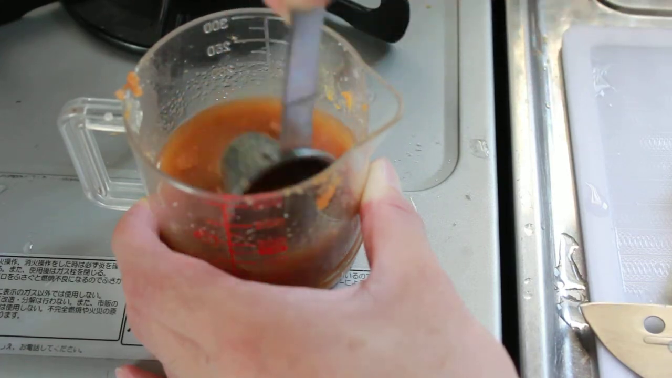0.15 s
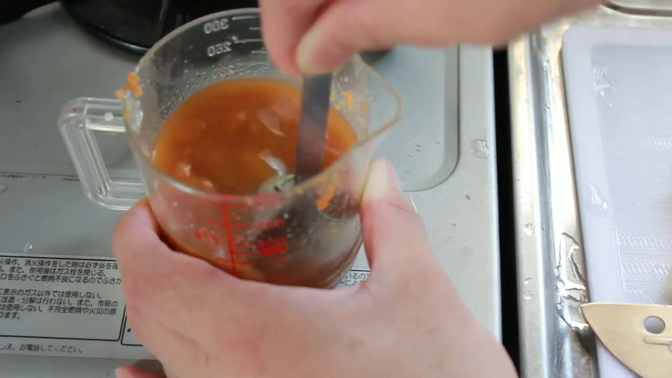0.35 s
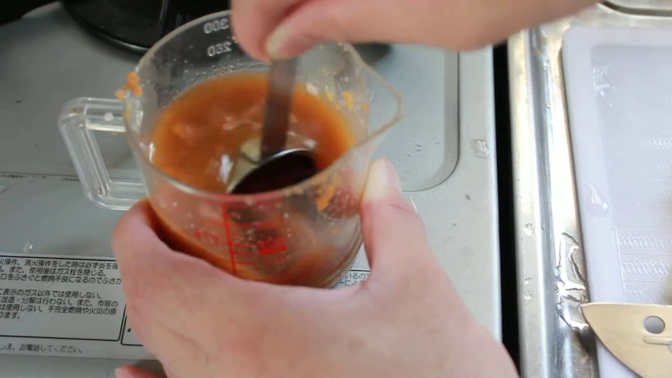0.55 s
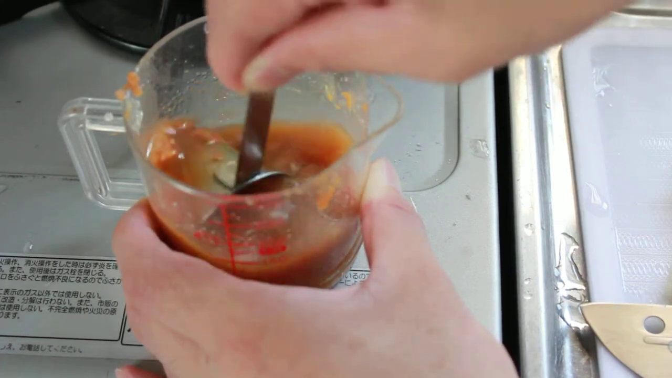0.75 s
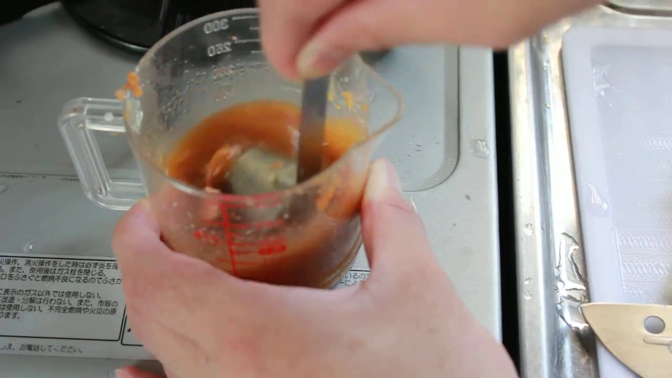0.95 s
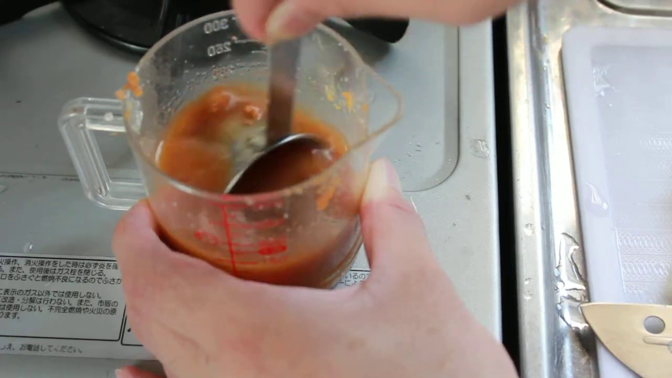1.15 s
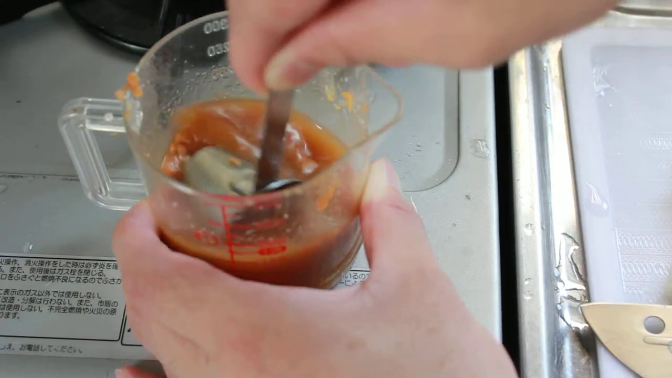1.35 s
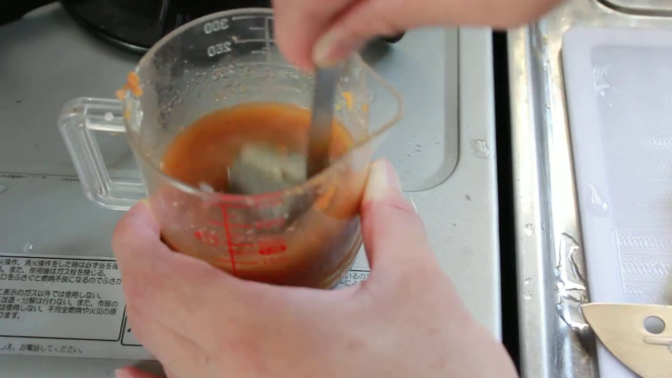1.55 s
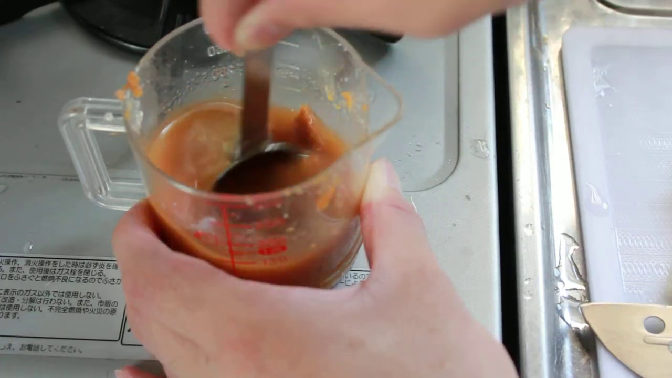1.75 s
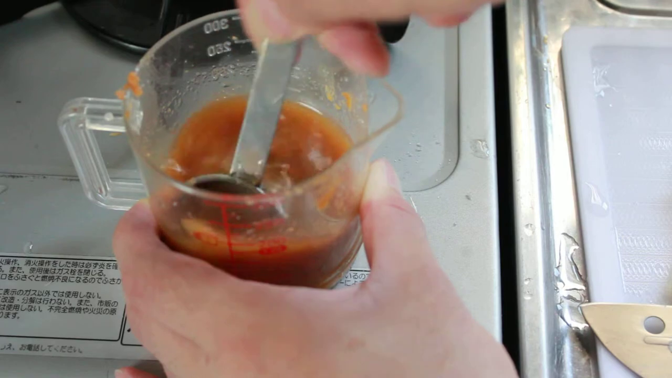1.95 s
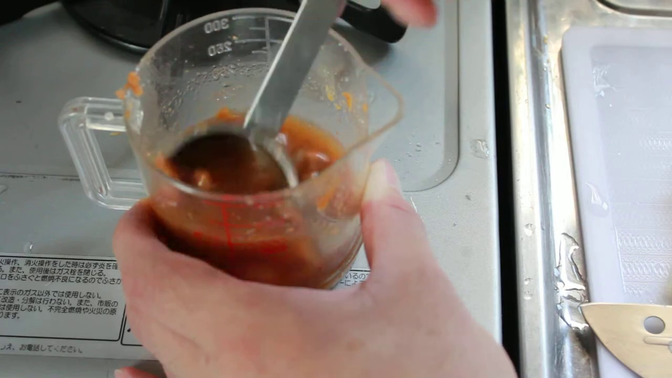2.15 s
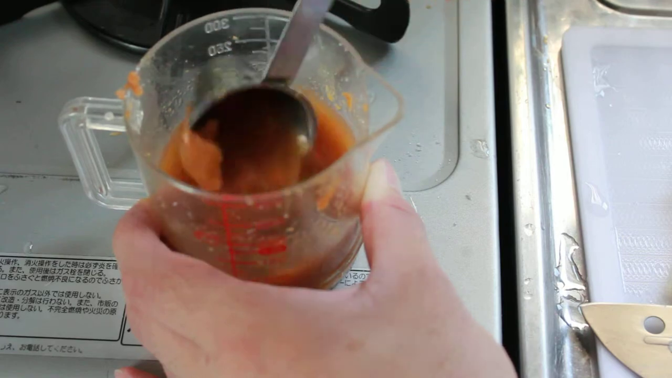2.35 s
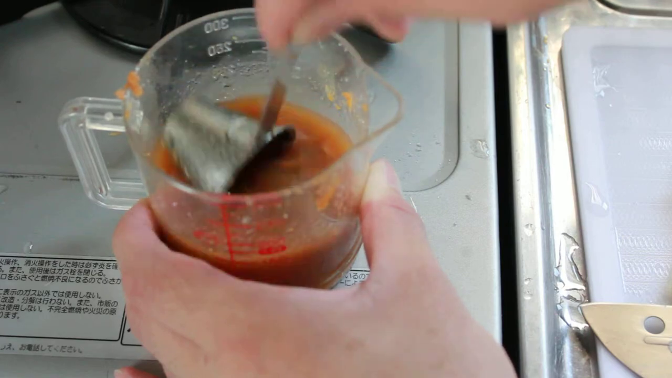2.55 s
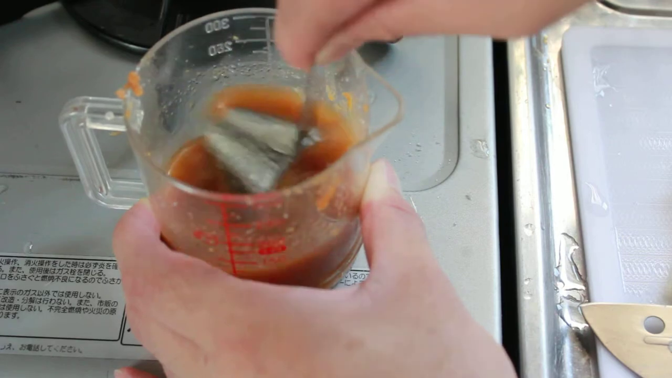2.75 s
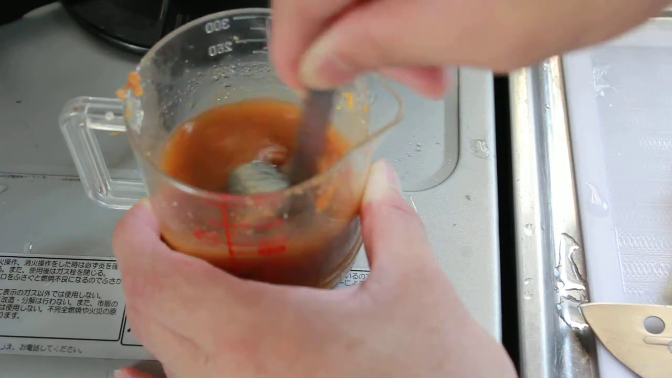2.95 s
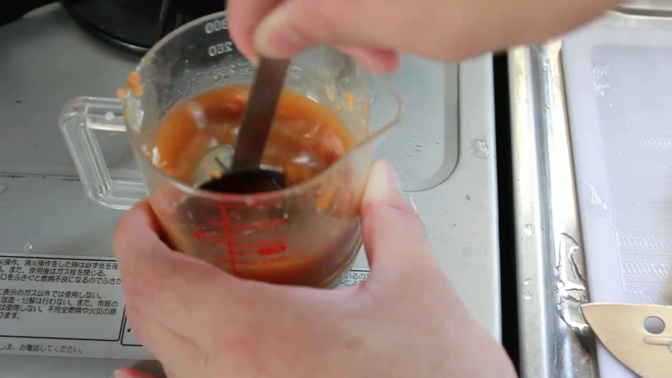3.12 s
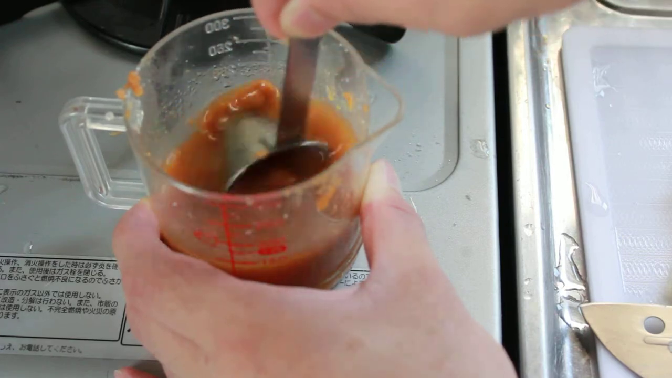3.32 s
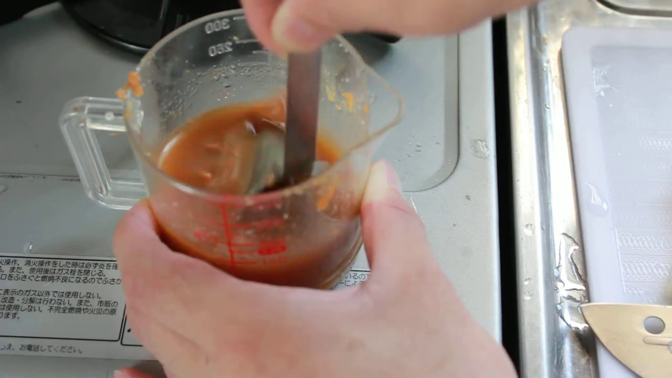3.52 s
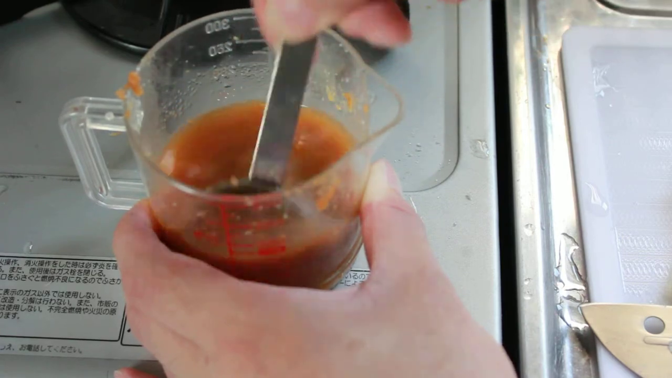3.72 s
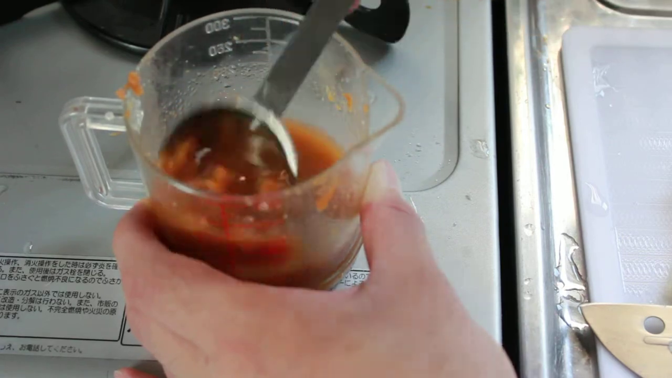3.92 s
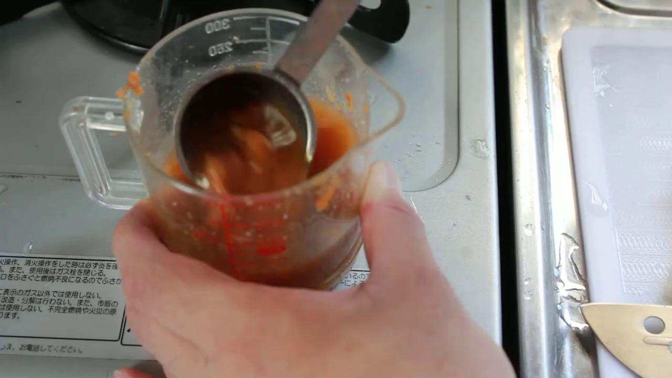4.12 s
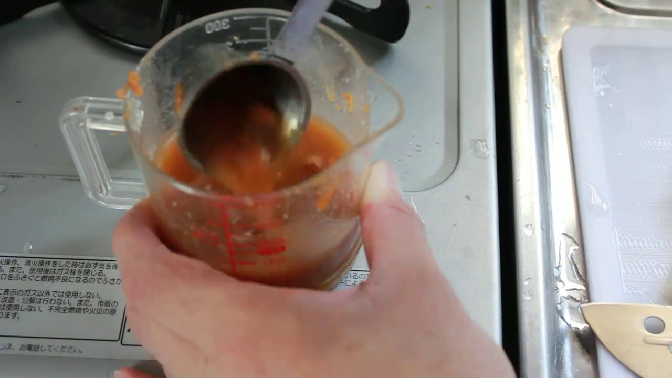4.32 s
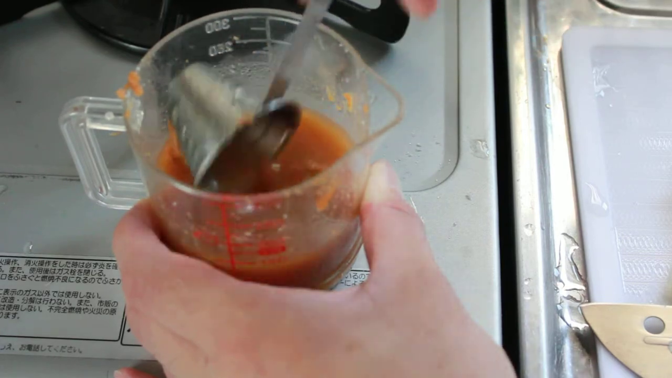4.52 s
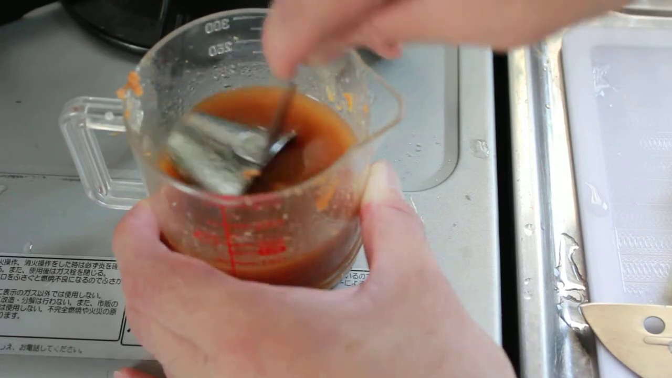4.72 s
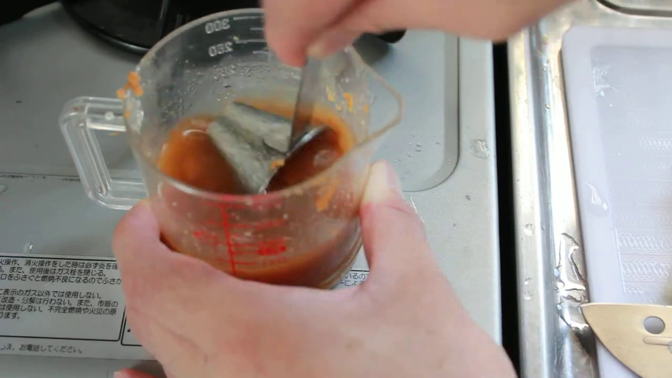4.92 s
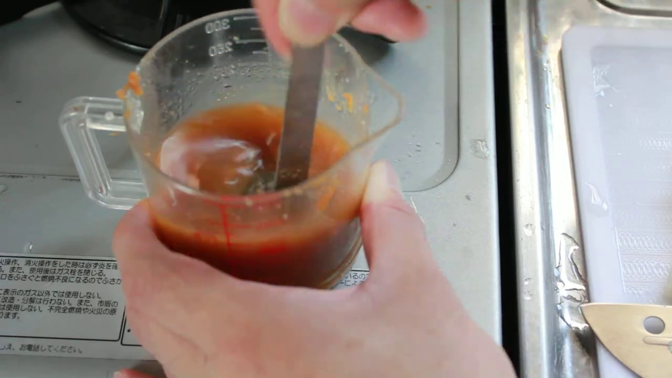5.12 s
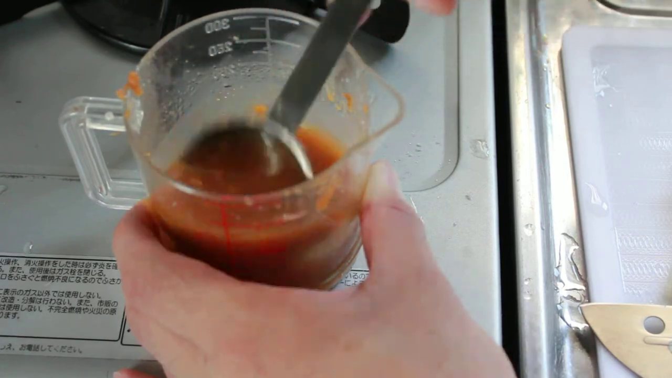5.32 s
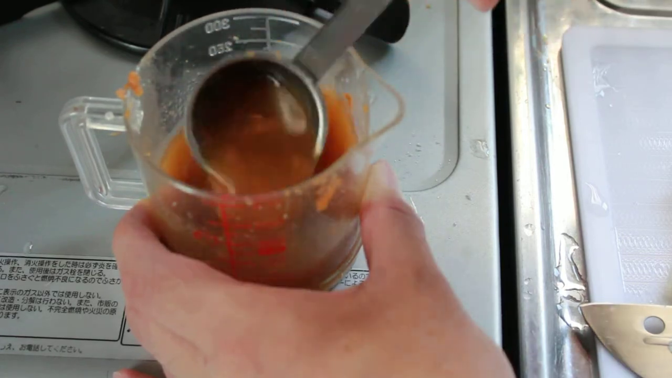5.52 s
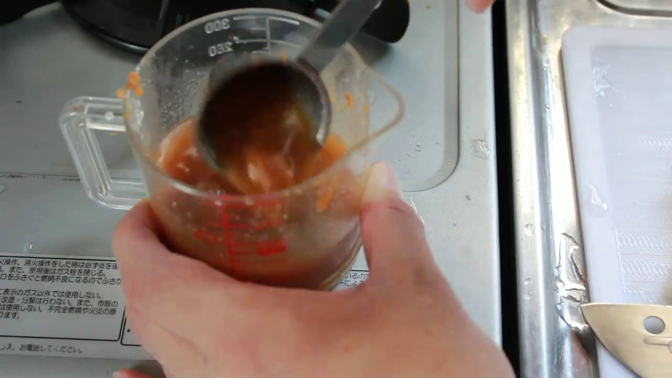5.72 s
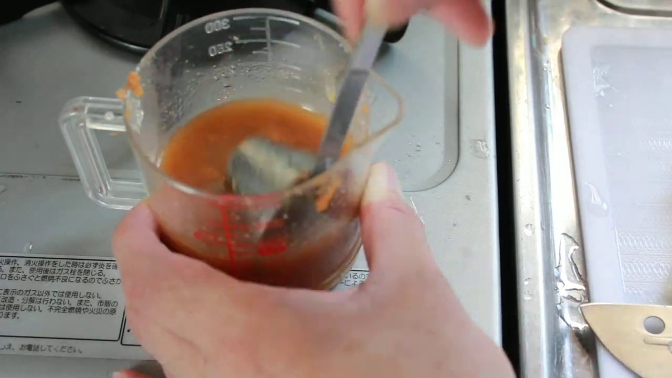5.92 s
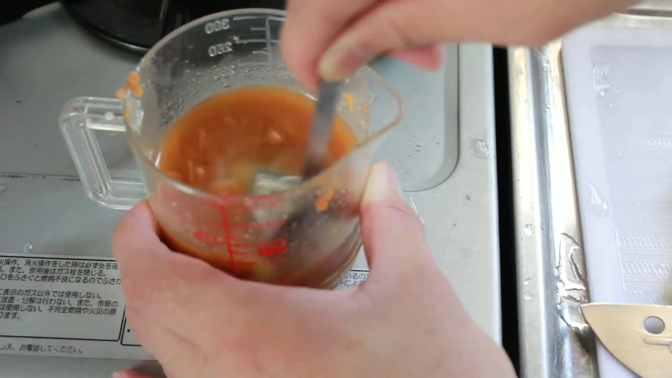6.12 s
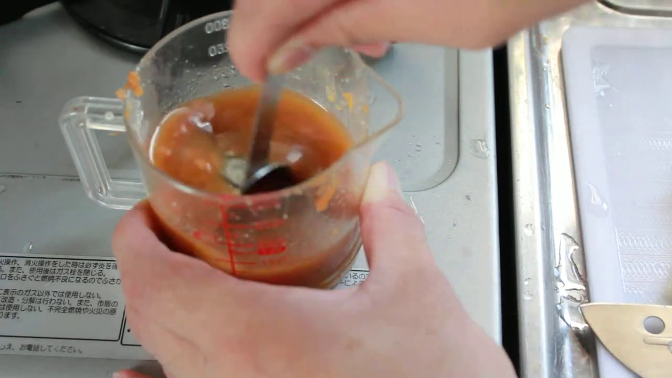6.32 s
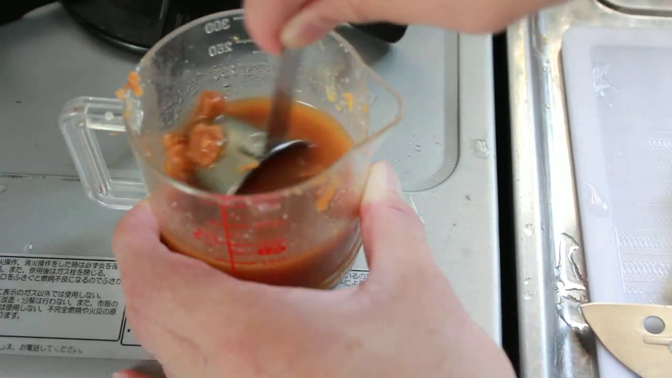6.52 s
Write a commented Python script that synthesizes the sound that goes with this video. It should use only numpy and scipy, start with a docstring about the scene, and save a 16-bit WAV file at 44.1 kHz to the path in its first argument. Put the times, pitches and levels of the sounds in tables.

```python
"""A steel measuring spoon stirs thick sauce in a hand-held plastic cup in a small hard kitchen.
For two seconds it knocks, chatters and drags on the wall: bursts of noise ring the cup, the sauce gulps low.
After a lull come the loudest knocks, near 2.6 and 2.9 s; a lull follows from 3.9 s, with drops ticking and
chirping at 4.2 and 4.3 s. A flurry from 4.6 s gives way to rising sine pings, lighter knocks and a last short
ping near 2.9 kHz. Decaying noise bands make the room ring on over coloured air noise and thin whines."""
import sys
import numpy as np
from scipy import signal
from scipy.fft import rfft, irfft, next_fast_len
from scipy.io import wavfile
from scipy.ndimage import uniform_filter1d

SR = 44100
rng = np.random.default_rng(int(sys.argv[2]) if len(sys.argv) > 2 else 0)


def unload_audio(sound):
    """Save the sound as a 16-bit wav file, at the path given as the first command line argument."""
    columns = np.transpose(np.atleast_2d(sound))
    # keep every value between -1 and 1, then stretch to whole-number steps
    steps = np.round(np.clip(columns, -1, 1) * 32767)
    wavfile.write(sys.argv[1], SR, steps.astype(np.int16))


def ratio(d):
    """dB to gain"""
    e = np.asarray(d, float) / 20
    return 10 ** e


N = 289731

# Spoon knocks on the wall. Each row: start in seconds, clack level in dB (as a sine's peak),
# thud level in dB rms, tick level in dB rms, chatter decay constant in ms.
SPOON_KNOCKS = [(0.1242, -14.5, -32.5, -33.5, 3.2), (0.1308, -17, -32, -45, 11),
                (0.1799, -21.5, -40, -29, 4), (0.2317, -31, -60, -36.5, 13), (0.2614, -19, -36.5, -28.5, 2),
                (0.344, -21, -32.5, -26, 6), (0.4249, -40, -55, -37, 3.6),
                (0.488, -21.5, -39.5, -37.5, 3.6), (0.565, -28.5, -45, -54, 5.3),
                (0.609, -20.5, -40.5, -29, 4.7), (0.7089, -15, -66, -24.5, 5.7),
                (0.7248, -20, -45, -30, 9.7), (0.776, -27.5, -35.5, -51, 4.0),
                (0.838, -16.5, -49, -33, 2.1), (0.8446, -19.5, -57, -26.5, 14),
                (1.03, -26.5, -30, -43, 8.3), (1.0816, -22.5, -27.5, -34, 5),
                (1.1288, -17.5, -42, -29.5, 3.4), (1.2358, -22, -37.5, -34, 7.3),
                (1.356, -29, -52, -47, 7.3), (1.3746, -22, -45, -34, 12), (1.4014, -24.5, -54, -32, 18),
                (1.509, -17.5, -32.5, -27, 4.3), (1.5507, -20, -45, -31.5, 8.5),
                (1.587, -23.5, -54, -35, 5.5), (1.685, -20, -29.5, -31.5, 6.1),
                (1.723, -18.5, -36.5, -22.5, 2.4), (1.7674, -28, -55, -28.5, 5.7),
                (1.821, -29, -39, -42, 2.6), (1.8534, -21.5, -49, -28.5, 22),
                (1.9144, -12.5, -22, -22.5, 7.4), (1.9639, -26.5, -30, -60, 5.7),
                (1.9956, -21, -50, -30.5, 15.4), (2.4506, -35, -40.5, -41, 5.6),
                (2.538, -30, -56, -38.5, 4.5), (2.6334, -7.5, -32, -20, 3.5), (2.725, -24, -47, -36, 5.9),
                (2.7468, -12.5, -52, -21.5, 4.2), (2.776, -24, -40, -50, 2.8), (2.842, -19, -31, -32, 6.8),
                (2.8873, -16.5, -34.5, -23, 9.1), (2.9082, -8, -21.5, -46, 2.3),
                (2.9955, -26.5, -45, -38.5, 27), (3.1334, -34, -38, -75, 1.8),
                (3.2645, -28, -37.5, -46, 5.3), (3.268, -16, -23.5, -33, 5.4),
                (3.4582, -28, -53, -27.5, 14), (3.473, -15, -25.5, -24.5, 6.6),
                (3.5292, -19.5, -43, -26, 5.8), (3.5827, -22, -34.5, -36, 14), (3.6305, -29, -55, -35, 3.1),
                (3.6571, -26, -43, -40, 25), (3.6725, -14.5, -26.5, -22, 2.7), (3.7254, -35, -45, -32, 2.4),
                (3.764, -29, -45, -27.5, 5.6), (3.7873, -20, -44, -29, 3.5), (3.8685, -23.5, -56, -62, 6.6),
                (4.6, -9.5, -30.5, -26.5, 3.4), (4.681, -26, -52, -34.5, 13),
                (4.7394, -9.5, -32, -22.5, 4.1), (4.785, -28, -60, -38, 2.1), (4.8205, -34, -54, -32, 4.5),
                (4.8396, -42, -50, -31, 10), (4.8697, -19, -33, -28.5, 3.4),
                (4.9898, -28.5, -35.5, -34, 13), (5.0099, -16, -40, -21.5, 13),
                (5.1352, -16.5, -25, -33, 5.2), (5.1419, -17.5, -26, -24, 7.5),
                (5.1992, -21, -57, -29, 2.4), (5.2076, -14.5, -60, -26, 1.8), (5.2224, -21, -50, -24, 3.6),
                (5.5299, -35, -67, -43, 11), (5.9076, -37, -48, -48, 7.1), (5.933, -20.5, -42, -43.5, 8.7),
                (6.0339, -27.5, -52, -41, 6.6), (6.0662, -14.5, -38, -25.5, 8.8),
                (6.1116, -25.5, -55, -32, 7.2), (6.1885, -29, -45, -32, 3.4),
                (6.279, -31, -37.5, -38.5, 4.6), (6.3683, -35.5, -51, -38.5, 5.6),
                (6.3972, -34, -58, -47, 5.6), (6.4785, -27.5, -46, -39.5, 4.4), (6.522, -44, -48, -44, 5.2)]
# Knocks whose spot on the wall favours some resonances. Each row: time in seconds, favoured pitch in Hz.
FAVOURED_PITCHES = [(0.1304, 1330), (0.344, 3050), (0.7091, 3150), (0.8444, 3600), (1.031, 1090),
                    (1.1288, 3080), (1.509, 2300), (1.723, 4950), (1.9159, 3400), (2.6332, 2730),
                    (2.7468, 1420), (2.9089, 1420), (3.268, 2640), (3.6725, 2450), (3.8676, 1570),
                    (4.5999, 1360), (4.7392, 2570), (5.0109, 4670), (5.1354, 3380), (5.2074, 3140),
                    (5.9074, 1680), (5.9328, 1420), (6.0669, 2060), (6.4792, 2900)]
# Resonances of the sauce-filled cup. Each row: pitch in Hz, width in Hz, mean strength in dB.
CUP_MODES = [(323, 28, -7), (504.7, 97, -6.5), (929, 95, -4), (1090, 43, -1), (1410, 150, -4.5),
             (1940, 156, -1.5), (2536, 465, -7.5), (3120, 62, 3), (3450, 156, 0.5), (4486, 172, 0.5),
             (5160, 620, -9), (5860, 172, -2.5), (6365, 110, -6.5), (7105, 290, -6), (7930, 870, -17.5),
             (10400, 460, -7.5), (13300, 1700, -16.5)]
# Plain crack of steel on plastic between the resonances. Each row: frequency in Hz, gain in dB.
PLAIN_CRACK = [(150, -30), (300, -20), (1000, -17), (4000, -16), (9000, -16), (13000, -19), (16000, -23)]
# Strokes along the wall. Each row: fastest moment in seconds, rasp level in dB, hiss level in dB,
# build-up in seconds per 20 dB, fade in seconds per 20 dB.
WALL_STROKES = [(0.202, -38, -55, 0.057, 0.33), (0.44, -35, -45, 0.1, 0.17), (0.519, -43, -60, 0.15, 0.02),
                (0.791, -37, -56, 0.14, 0.24), (0.91, -32, -39, 0.17, 0.055),
                (1.002, -41, -57, 0.022, 0.17), (1.192, -41, -53.5, 0.088, 0.32),
                (1.49, -39.5, -48, 0.24, 0.23), (1.67, -34.5, -46, 0.35, 0.088),
                (1.84, -32, -46, 0.078, 0.13), (2.12, -47, -75, 0.15, 0.055),
                (2.469, -50, -51, 0.045, 0.19), (2.7, -37, -48, 0.086, 0.1), (2.79, -30, -30, 0.12, 0.078),
                (2.84, -26, -27, 0.04, 0.11), (3.04, -39, -51, 0.35, 0.19), (3.49, -32.5, -40, 0.048, 0.29),
                (3.61, -34.5, -33.5, 0.1, 0.064), (3.7, -31, -53, 0.08, 0.05), (3.819, -31, -41, 0.16, 0.1),
                (4.83, -34, -40.5, 0.033, 0.27), (4.97, -33.5, -42, 0.061, 0.23),
                (5.045, -27, -35, 0.042, 0.097), (5.279, -43, -49, 0.15, 0.055),
                (5.911, -42.5, -59, 0.03, 0.05), (6.1, -49, -50, 0.05, 0.3), (6.18, -34, -40.5, 0.15, 0.12),
                (6.31, -44.5, -60, 0.08, 0.42), (6.53, -40.5, -53, 0.085, 0.23)]
# Surges of sauce pushed against the wall. Each row: time in seconds, gulp level in dB,
# level in dB of the rumble of the cup's base.
SAUCE_SURGES = [(0.165, -37, -44), (0.29, -40.5, -38), (0.42, -58, -45), (0.78, -38.5, -40),
                (1.1, -37, -42.5), (1.22, -55, -38), (1.41, -47, -44), (1.55, -43, -33.5),
                (1.75, -47, -37.5), (1.89, -50, -38), (2.04, -40, -38.5), (2.47, -43, -42.5),
                (2.68, -48, -36.5), (2.84, -36.5, -38.5), (2.92, -39.5, -31), (3.02, -53, -44),
                (3.11, -42, -36), (3.49, -43, -41), (3.69, -38.5, -33.5), (3.85, -44.5, -40),
                (4.65, -44, -38.5), (4.76, -39.5, -33.5), (4.87, -38, -40), (5.12, -40, -42.5),
                (5.29, -48, -45.5), (5.92, -44.5, -41), (6.09, -45.5, -41), (6.23, -46, -40.5),
                (6.42, -51.5, -47.5)]
# Air pockets closing in the sauce. Each row: ringing pitch in Hz, relative strength in dB.
AIR_POCKETS = [(155, -7.5), (210, -2.5), (245, 1.5), (325, -3)]
# Drops and short pings: plinks in the sauce, small clinks of the spoon. Each row: start in seconds,
# ping peak in dB, starting pitch in Hz, time to fall 60 dB in seconds.
SHORT_PINGS = [(2.4326, -35, 3450, 0.018), (4.2147, -26.5, 5350, 0.0073), (4.322, -40, 7600, 0.027),
               (5.399, -32.5, 1290, 0.018), (5.5302, -13.5, 5650, 0.0064), (5.5635, -20, 1410, 0.023),
               (5.655, -26, 2750, 0.0086), (6.4793, -23, 2920, 0.034)]
# Reverberation of the kitchen. Each row: frequency in Hz, time to fall 60 dB in seconds.
ROOM_DECAY = [(200, 0.43), (600, 0.3), (1500, 0.46), (4000, 0.26), (10000, 0.17), (16000, 0.13)]
# Colour of the background air noise. Each row: frequency in Hz, relative density in dB per Hz.
AIR_COLOUR = [(18, -5), (30, -5.5), (124, 0), (157, -6), (184, 2.5), (319, 4.5), (584, -5.5), (801, -5.5),
              (1070, -10.5), (1760, -14.5), (5900, -22.5), (6380, -21), (8300, -25), (10500, -25),
              (16000, -31)]
# Appliance whines. Each row: pitch in Hz, level in dB rms.
APPLIANCE_WHINES = [(312.2, -67.5), (985.1, -67.5), (3079, -68), (5469, -91), (6261, -69.5), (10573, -89),
                    (10783, -68)]


def knocks(grain_db=1.5, clump_db=2.0, rise_share=0.064, thud_width_hz=69.0, thud_detune=0.062):
    """A knock is a swelling and dying run of uneven contacts that ring the cup."""
    size = 4096
    head, blur = 660, 130  # samples: 15 ms to level thud and tick, 3 ms for the clack
    spread_db, detune = 2.5, 0.025
    out = np.zeros(N + size)
    f, t = np.fft.rfftfreq(size, 1 / SR), np.arange(size) / SR
    low, middle, high = three_bands(f)
    for s, clack_db, thud_db, tick_db, chatter_ms in SPOON_KNOCKS + bumps():
        age = 1000 * t / chatter_ms
        contacts = rng.standard_normal(size) * ratio(grain_db * rng.standard_normal(size))
        # ragged clusters of slips
        contacts *= ratio(clump_db * np.repeat(rng.standard_normal(size // 64), 64))
        contacts *= (1 - np.exp(-age / rise_share)) * np.exp(-age) * (t < 0.05)

        # moving sauce loads the wall anew each time: strengths and pitches shift
        strength, tuning = rng.standard_normal((2, len(CUP_MODES)))
        body = cup(f, spread_db * strength + favour(s), 1 + detune * tuning)
        # the heavy base mode carries the thud
        base_hz = CUP_MODES[1][0] * (1 + thud_detune * tuning[1])
        base = low * resonance(f, base_hz, thud_width_hz)

        ringing = rfft(contacts) * body
        thud, clack, tick = (irfft(ringing * band) for band in (base, middle, high))
        sound = ratio(clack_db) * clack / np.sqrt(2 * uniform_filter1d(clack ** 2, blur).max())
        sound += ratio(thud_db) * thud / thud[:head].std()
        sound += ratio(tick_db) * tick / tick[:head].std()
        i = round(s * SR)
        out[i:i + size] += sound
    return out[:N]


def bumps(scatter_s=0.03, over_rasp_db=-0.6, spread_db=3.9):
    """Each stroke also bumps the wall lightly once, at a chance moment, about as strongly as it rasps."""
    chance = rng.standard_normal((len(WALL_STROKES), 2))
    rows = []
    for (s, rasp_db, *_), (early, more) in zip(WALL_STROKES, chance):
        db = rasp_db + over_rasp_db + spread_db * more
        start = min(s + scatter_s * early, N / SR)
        rows.append((start, db, db - 12, db - 7.5, 6.6))  # columns as in SPOON_KNOCKS
    return rows


def favour(s, boost_db=7.5, reach_octaves=0.43):
    """Extra dB for each resonance near the pitch favoured by the spot struck at time s."""
    near = [hz for at, hz in FAVOURED_PITCHES if abs(at - s) < 0.004]
    mode_hz = np.array(CUP_MODES)[:, 0]
    return sum(boost_db * np.exp(-(np.log2(mode_hz / hz) / reach_octaves) ** 2) for hz in near)


def cup(f, mode_db, tuning):
    """The cup's answer to a touch: its resonances, each with a strength and tuning, over the plain crack."""
    answer = ratio(at_hz(PLAIN_CRACK, f))
    for k, ((hz, width, db), more, shift) in enumerate(zip(CUP_MODES, mode_db, tuning)):
        answer = answer + (-1) ** k * ratio(db + more) * resonance(f, hz * shift, width)
    return answer


def drag(slips_per_s=1500.0, grain_db=3.5, judder_db=2.0, gulps_per_s=150.0, gulp_width_hz=36.6):
    """The spoon's edge sticks and slips in clumps and sounds through the cup; the pushed sauce gulps low."""
    sizes = ratio(grain_db * np.minimum(rng.exponential(1, N), 3.0)) * rng.choice([-1, 1], N)
    slips = sizes * (rng.random(N) < slips_per_s / SR) * ratio(judder_db * drift(33.0))
    size = next_fast_len(N)
    f = np.fft.rfftfreq(size, 1 / SR)
    low, middle, high = three_bands(f)

    # the edge wanders over five spots of the wall, each stirring the resonances in its own way
    spots, changes_per_s = 5, 12.0  # the second sets the pace of the wander
    spot = np.argmax([drift(changes_per_s) for _ in range(spots)], axis=0)
    colours = rng.standard_normal((spots, 2, len(CUP_MODES)))
    rubbed = 0
    for k, (more, shift) in enumerate(colours):
        rubbed = rubbed + rfft(slips * (spot == k), size) * cup(f, 3.0 * more, 1 + 0.06 * shift)

    sloshed = 0
    for hz, db in AIR_POCKETS:
        closings = rng.random(N) < gulps_per_s / len(AIR_POCKETS) / SR
        gulps = rng.standard_normal(N) * closings
        sloshed = sloshed + ratio(db) * rfft(gulps, size) * resonance(f, hz, gulp_width_hz) ** 2

    spectra = (rubbed * middle, rubbed * low, rubbed * high, sloshed)
    rasp, rumble, hiss, slosh = [rms_one(irfft(x, size)[:N]) for x in spectra]
    s, rasp_db, hiss_db, rise_s, fade_s = np.transpose(WALL_STROKES)
    out = swells(s, rasp_db, rise_s, fade_s) * rasp
    out += swells(s, hiss_db, rise_s, fade_s) * hiss
    s, gulp_db, rumble_db = np.transpose(SAUCE_SURGES)
    rise_s, fade_s = 0.09, 0.21  # per 20 dB
    out += swells(s, gulp_db, rise_s, fade_s) * slosh
    out += swells(s, rumble_db, rise_s, fade_s) * rumble
    return out


def swells(s, db, rise_s, fade_s):
    """Gain over time of events that build up to their level and fade, straight in dB; times are per 20 dB."""
    t = np.arange(N) / SR
    level_db = np.full(N, -120.0)
    for at, top, rise, fade in np.broadcast(s, db, rise_s, fade_s):
        late = t - at
        level_db = np.maximum(level_db, top - 20 * np.maximum(late / fade, -late / rise))
    return ratio(level_db)


def short_pings(rise=3.4, tick_db=-22.0):
    """Drops and short pings, plinks or small clinks: a noise tick and a sine whose pitch climbs as it dies."""
    t = np.arange(4410) / SR
    out = np.zeros(N + len(t))
    for s, peak_db, hz, t60 in SHORT_PINGS:
        ping = np.sin(2 * np.pi * hz * (t + rise * t ** 2)) * ratio(-60 * t / t60)
        tick = np.diff(rng.standard_normal(len(t) + 1)) * np.exp(-t / 0.0014)
        i = round(s * SR)
        out[i:i + len(t)] += ratio(peak_db) * (ping + ratio(tick_db) * tick)
    return out[:N]


def kitchen(x, first_echo_s=0.0018):
    """Dense echoes: half-octave bands of noise, each dying at its own rate."""
    t, tail = np.arange(SR // 2) / SR, 0
    edges = 150 * 2 ** np.arange(0, 7.1, 0.5)
    for low, high in zip(edges, edges[1:]):
        band_pass = signal.butter(2, [low, high], "band", fs=SR, output="sos")
        band = signal.sosfilt(band_pass, rng.standard_normal(len(t)))
        tail = tail + band * ratio(-60 * t / at_hz(ROOM_DECAY, np.sqrt(low * high)))
    tail *= 1 - np.exp(-(t / first_echo_s) ** 2)  # the echoes set in softly
    return signal.fftconvolve(x, tail / np.sqrt(np.sum(tail ** 2)))[:N]


def background(air_db=-48, whine_width_hz=7.3):
    """Coloured air noise, and whines as noise in very narrow resonances."""
    size = next_fast_len(N)
    f = np.fft.rfftfreq(size, 1 / SR)
    air_white, whine_white = rfft(rng.standard_normal((2, size)))
    out = ratio(air_db) * rms_one(irfft(air_white * ratio(at_hz(AIR_COLOUR, f)), size))
    for hz, db in APPLIANCE_WHINES:
        narrow = resonance(f, hz, whine_width_hz * np.sqrt(hz / 1000)) ** 2
        out += ratio(db) * rms_one(irfft(whine_white * narrow, size))
    return out[:N]


def resonance(f, hz, width_hz):
    """Complex response of one resonance, gain 1 on top."""
    return 1j * f * width_hz / (hz ** 2 - f ** 2 + 1j * f * width_hz)


def three_bands(f, deep_hz=260, low_hz=720, high_hz=7000):
    """Low, middle and high parts of the spectrum; the small cup radiates nothing deep."""
    def edge(hz, kind):
        return signal.freqs(*signal.butter(4, hz, kind, analog=True), f)[1]
    low = edge(deep_hz, "high") * edge(low_hz, "low")
    middle = edge(low_hz, "high") * edge(high_hz, "low")
    return low, middle, edge(high_hz, "high")


def drift(rate_hz):
    """Slow random wander of rms 1: noise through two equal one-pole low-passes, started a second early."""
    r = np.exp(-2 * np.pi * rate_hz / SR)
    return rms_one(signal.lfilter([1], [1, -2 * r, r * r], rng.standard_normal(N + SR))[SR:])


def rms_one(x):
    """Scale to rms 1."""
    return x / np.sqrt(np.mean(x ** 2) + 1e-20)


def at_hz(points, hz):
    """Read a table of frequency and value on a log-frequency axis."""
    table_hz, values = np.transpose(points)
    return np.interp(np.log(hz + 1), np.log(table_hz), values)


def scene(room_db=-5, rim_shade_db=-2):
    """Everything at the cup is heard directly and through the room; the rim shades the pings from the walls."""
    wall, pings = knocks() + drag(), short_pings()
    room = kitchen(wall + ratio(rim_shade_db) * pings)
    mix = wall + pings + ratio(room_db) * room + background()
    return mix[None]


def band_limit(x):
    """A steep low-pass at the top of the band."""
    return signal.sosfilt(signal.butter(12, 16970, fs=SR, output="sos"), x)


def record(dry):
    """A steep low-pass removes the top of the treble, from 16.1 kHz up."""
    low_pass = signal.cheby2(20, 50, 16100, fs=SR, output="sos")
    finished = signal.sosfilt(low_pass, dry)
    return band_limit(finished)


dry = scene()
out = record(dry)
unload_audio(out)
```